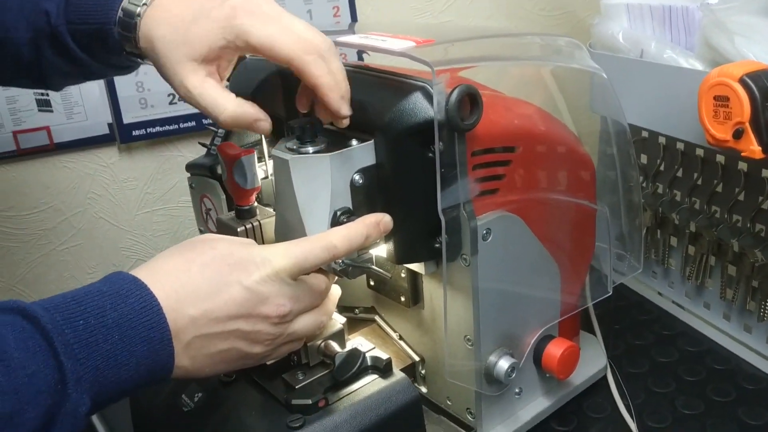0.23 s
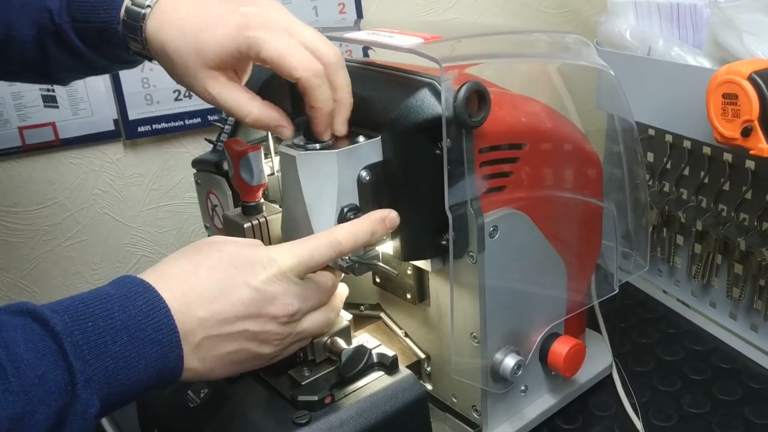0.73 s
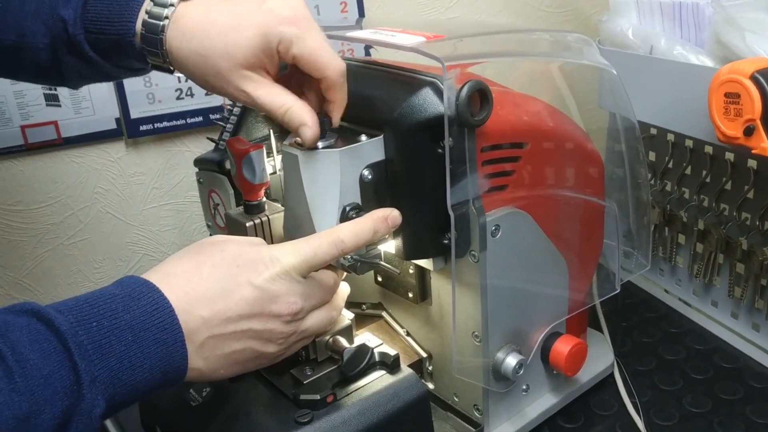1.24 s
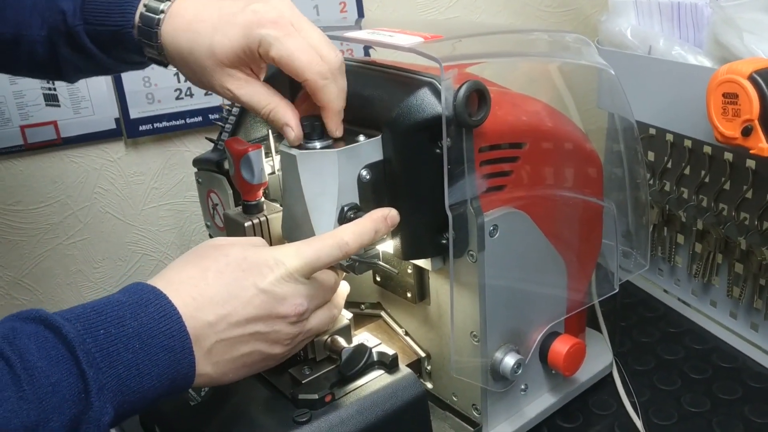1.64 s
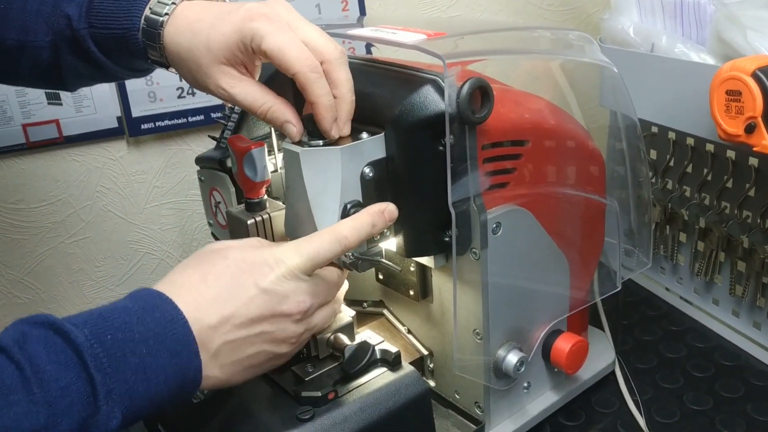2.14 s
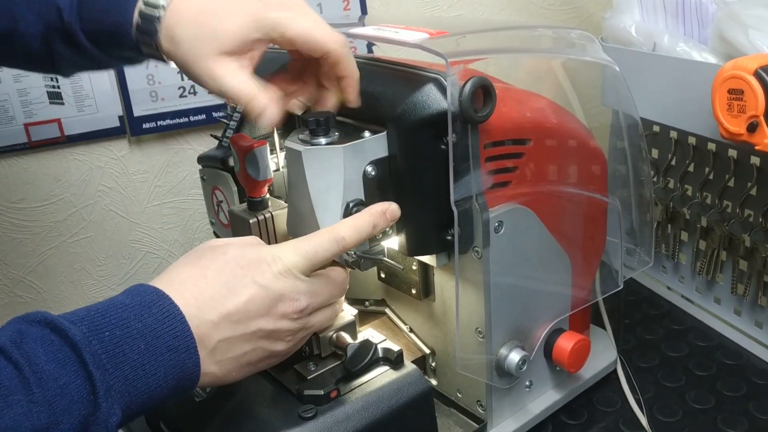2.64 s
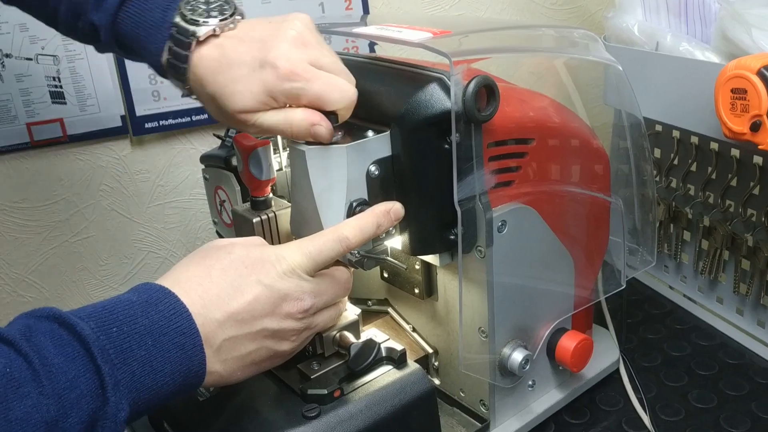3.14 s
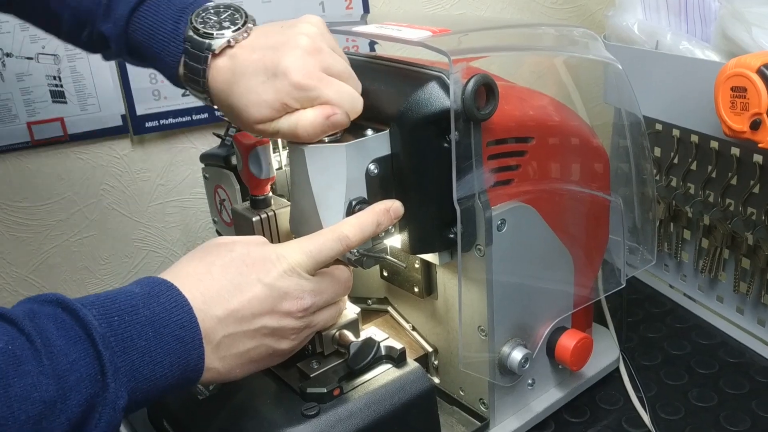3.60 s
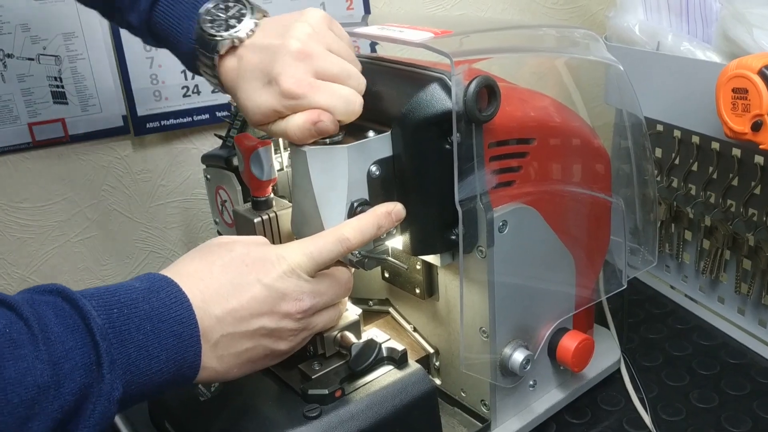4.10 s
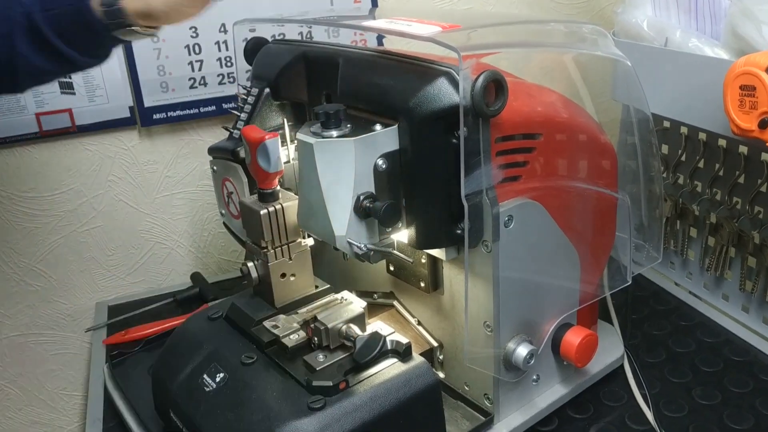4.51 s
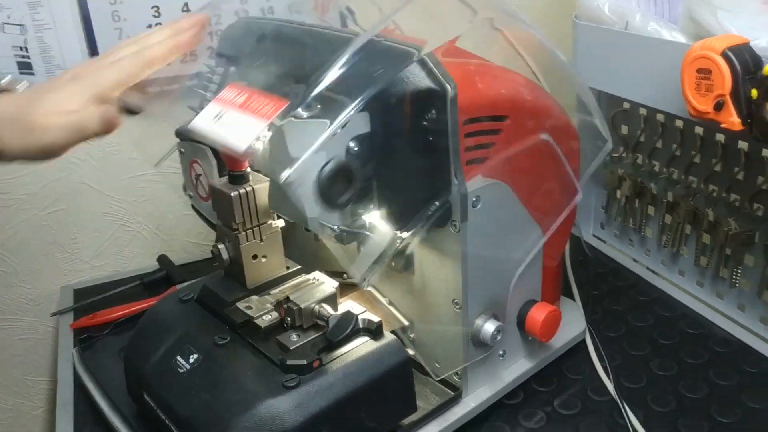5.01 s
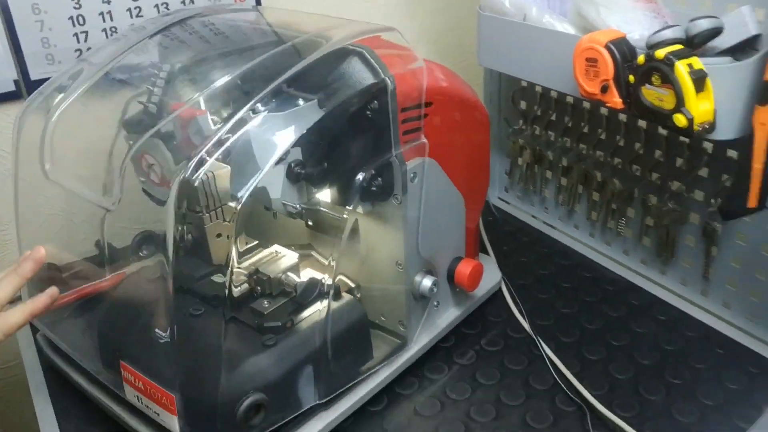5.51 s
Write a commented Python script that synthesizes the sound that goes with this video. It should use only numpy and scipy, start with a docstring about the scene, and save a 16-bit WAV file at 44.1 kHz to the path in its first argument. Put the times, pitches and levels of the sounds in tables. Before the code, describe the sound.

Over steady thin hiss and quiet room murmur, small metal parts tick, scrape and rattle under the fingers. After a sparser stretch comes a bright, heavy metallic clack, the loudest early event. Light scuffs and dull taps on the housing lead to a plastic cover rubbing as it swings, a hollow knock, and a final deep thud with crackling plastic edges. Close, fairly dry stereo pickup.

```python
"""Clamp nut and guard of a key-cutting machine

In a small workshop a clamp nut is turned by hand: its thread scuffs, loose metal clicks, and it seats with a hard clack.
The hand bumps the housing, then the clear plastic guard is swung down and thuds shut.
Metal and plastic are struck modes with filtered noise; slides are trains of tiny slips that drive the metal.
A low room murmur and a thin, ringing hiss, both filtered noise, lie underneath.
"""
import sys
import numpy as np
from scipy import signal
from scipy.fft import rfft, irfft
from scipy.io import wavfile
from scipy.ndimage import uniform_filter1d

SR = 44100
rng = np.random.default_rng(int(sys.argv[2]) if len(sys.argv) > 2 else 0)


def dump(signal):
    """Clip the signal to [-1, 1] and save it as 16-bit WAV at the path in sys.argv[1]."""
    limited = np.clip(np.atleast_2d(signal).T, -1, 1)
    pcm = np.round(limited * 32767).astype(np.int16)
    wavfile.write(sys.argv[1], SR, pcm)


N = 253575
SIZE = int(0.4 * SR)   # length of one contact sound (samples)
AGE = np.arange(SIZE) / SR   # time since the contact began (s)


def from_db(db):
    """Logarithmic level: decibels to amplitude gain."""
    return 10 ** (np.asarray(db) / 20)


def rms_one(x):
    """Mean power: scale to unit rms."""
    return x / np.sqrt(np.mean(x ** 2) + 1e-20)


def loudest_one(x, size=882):
    """Short-time power: scale so that the loudest 20 ms have unit rms."""
    power = uniform_filter1d(np.mean(x ** 2, axis=0), size)
    return x / np.sqrt(power.max() + 1e-20)


def at_hz(points, hz):
    """Logarithmic pitch scale: interpolate a table over log frequency."""
    f, value = np.transpose(points)
    return np.interp(np.log(hz + 1e-3), np.log(f), value)


def pan(db):
    """Interaural level difference: left and right gains that share it equally."""
    return from_db(np.array([db, -db]).reshape(2, -1) / 2)


def band(x, low_hz, high_hz, order=2):
    """Causal filtering: a Butterworth band-pass."""
    edges_hz = [low_hz, min(high_hz, SR / 2 - 1)]
    return signal.sosfilt(signal.butter(order, edges_hz, "band", fs=SR, output="sos"), x)


def around(x, hz, octaves):
    """Constant relative bandwidth: a band-pass given by its centre and width."""
    edge = 2 ** (max(octaves, 0.05) / 2)
    return band(x, hz / edge, hz * edge)


def add(out, s, sound):
    """Superposition: mix a sound in, starting at time s."""
    at = max(round(s * SR), 0)
    out[:, at:at + sound.shape[1]] += sound[:, :N - at]


def drive(response, force):
    """Linear response: convolve the response of a body with the force on it."""
    return signal.fftconvolve(response, force[None], axes=1)[:, :SIZE]


# coherence of the two sides: f/Hz, correlation (1 alike, -1 opposed)
LIKENESS = [(130, 1), (300, 0.85), (640, 0.46), (1400, 0.09), (3100, 0), (6800, -0.17), (15000, 0)]
# level difference of the two sides: f/Hz, left minus right/dB
BALANCE = [(130, 4.5), (330, -1), (550, 3), (1300, 4), (2300, 6), (3800, 0), (7000, 1.5), (11000, 9),
           (15000, 11)]


def noise(spectrum, size):
    """Partial coherence: coloured noise at two microphones, alike in the bass, mostly stronger left in the treble."""
    hz = np.fft.rfftfreq(size, 1 / SR)
    mid, side = rfft(rng.standard_normal((2, size)))
    alike = np.clip(at_hz(LIKENESS, hz), -1, 1)
    pair = np.sqrt(1 + alike) * mid + np.sqrt(1 - alike) * side * [[1], [-1]]
    shaped = pair * from_db(at_hz(spectrum, hz)) * pan(at_hz(BALANCE, hz))
    return rms_one(irfft(shaped, size))


# spectrum of the room murmur: f/Hz, relative level/dB
ROOM_AIR = [(20, -44), (60, -33), (110, -19.5), (150, -9), (190, 9), (240, 0), (400, -5), (650, -8),
            (1200, -11.5), (3000, -10), (4200, -15), (6000, -20), (16000, -16)]
# spectrum of the hiss: f/Hz, relative level/dB
HISS = [(3000, -33), (5200, -7.5), (6200, 0), (6900, 9), (7700, 4.5), (8100, 2), (8600, -4), (9000, -78),
        (10300, -0.5), (11200, -9), (13300, 2), (15600, -3.5), (16000, -24)]
# ringing bands: f/Hz, width/Hz, rms level before the common trim/dB, left minus right/dB
WHINES = [(525, 45, -62.5, 4), (1900, 260, -66, 9), (7130, 200, -57, 4), (7380, 120, -56, 5),
          (8420, 110, -61, 5), (4395, 60, -73, 12), (5850, 240, -70, 4)]


def background(air_db=-51, hiss_db=-51.5, whine_trim_db=-1.0):
    """Stationary noise: a room murmur and a steady hiss with a few narrow bands that ring."""
    out = from_db(air_db) * noise(ROOM_AIR, N) + from_db(hiss_db) * noise(HISS, N)
    for hz, width_hz, db, side_db in WHINES:
        source = rng.standard_normal((2, N)) + 1.3 * rng.standard_normal(N)   # partly common to both sides
        whine = band(source, hz - width_hz / 2, hz + width_hz / 2)
        out += from_db(db + whine_trim_db) * pan(side_db) * rms_one(whine)
    return out


# touching fingers shift the upper modes: full spread as a share of pitch, lower limit (Hz)
TOUCH_DETUNE, DETUNE_ABOVE_HZ = 0.034, 900
# modes of clamp and housing: f/Hz, relative level/dB, t60/s
MACHINE = [(235, -8, .13), (283, -9, .13), (345, -13, .10), (530, 4.5, .11), (675, -7, .08),
           (780, -11, .08), (980, -11, .08), (1190, 2, .1), (1320, -9, .14), (1530, -4, .05),
           (1685, -9, .05), (1922, 7, .055), (2090, -4, .07), (2432, 7, .05), (2500, 5, .055),
           (2580, -1, .10), (2725, -7, .10), (2950, -2, .06), (3150, -3, .05), (3520, -6, .06),
           (3880, -10, .05), (7000, -6, .03), (11600, 1, .04)]


def ring(modes, spread_db, detune):
    """Modal superposition: decaying sines, varied in strength and upper pitch, out of step where the sides differ."""
    out = np.zeros((2, SIZE))
    for k, (hz, db, t60) in enumerate(modes):
        hz = hz * (1 + detune * rng.standard_normal() * (hz > DETUNE_ABOVE_HZ))
        half_phase = np.arccos(np.clip(at_hz(LIKENESS, hz), -1, 1)) / 2
        skew = half_phase * rng.choice([-1, 1]) * np.array([[1], [-1]])
        strength = from_db(db + spread_db * rng.standard_normal())
        gain = (-1) ** k * strength * pan(at_hz(BALANCE, hz))   # neighbours alternate in sign
        out += gain * np.sin(2 * np.pi * hz * AGE + skew) * from_db(-60 * AGE / t60)
    return out


# spectrum of the crowd of short modes: f/Hz, relative level/dB
DENSE = [(100, -66), (200, 5), (700, 9.5), (1500, 9.5), (3000, 6.5), (4000, 2.5), (4800, -3.5), (5900, 3),
         (7500, 3), (9500, -4), (12000, 6.5), (15000, -8.5), (16000, -8)]


def machine(dense_db, dense_t60, spread_db=8.0, detune=TOUCH_DETUNE, hold_s=0.011,
            direct=0.43, direct_s=0.0033, room_db=-21, room_t60=0.31):
    """Impulse response to one touch: main modes, a crowd of short modes and close reflections, a dull room tail."""
    direct_part = direct * np.exp(-AGE / direct_s)
    held_part = from_db(-60 * np.maximum(AGE - hold_s, 0) / dense_t60)
    crowd = (direct_part + held_part) * noise(DENSE, SIZE)
    room = band(noise(DENSE, SIZE), 260, 12000) * from_db(room_db - 60 * AGE / room_t60)
    return ring(MACHINE, spread_db, detune) + from_db(dense_db) * (crowd + room)


KNOCK_DB, TICK_DB = -15, 3.5   # knock relative to the click level; offset added to each snap
CLICK_ROOM_DB = -7   # room tail, relative to the crowd of short modes
PART_DB, PART_OCTAVES = 4.5, 0.18   # narrow band added for the loose part: gain, width
# a weak ring also decays sooner: ring level of the full extra decay (dB), that decay (dB per s)
WEAK_RING_DB, WEAK_DB_PER_S = -74, 498
# ring level at and under which the fingers shift the modes fully (dB); share of that shift in a free ring
TOUCH_RING_DB, FREE_DETUNE_SHARE = -13.5, 0.25
# edges of the six bands thud, knock, main, ring, edge, snap: f/Hz
CLICK_BANDS_HZ = [170, 400, 900, 2200, 2800, 4200, 16500]
# metal contacts: t/s, level/dB, then relative to it ring/dB, edge/dB, snap before TICK_DB/dB, thud/dB; loose part f/Hz
CLICKS = [(0.106, -34, -13, -28, -26, -40, 1660), (0.219, -39.5, -6, -21, -22, -19, 1700),
          (0.45, -37.5, 2.5, -4.5, -13, -10.5, 2410), (0.472, -34, -6, -7, -10.5, -29, 2140),
          (0.528, -43.5, 1, -1.5, -17, -5, 2060), (0.632, -42, -20, -15, -17, -5.5, 1560),
          (0.728, -40, -10, -6.5, -17, -7.5, 1770), (0.777, -47, -1, -14, -16, -8, 1860),
          (0.828, -39, -5.5, -9.5, -24, -26, 1990), (1.041, -31.5, 3, -3, -9, -29, 2410),
          (1.078, -32, 3.5, -2, -5.5, -21, 2340), (1.314, -37.5, 5.5, -7, -5, -8, 3010),
          (1.354, -30, -8, -11, -12, -19, 2070), (2.0845, -37.5, -31, -8, -6.5, -41, 5800),
          (2.1822, -33, -36, -11.5, -3.5, -18, 6060), (2.555, -35.5, -13, -14.5, -9, -8, 1640),
          (3.414, -44.5, 2, 1, -10, -16, 2500), (3.49, -53.5, -15, -4, 5.5, -9, 6450),
          (4.307, -48, -6, -20, -18, 0.5, 1770), (4.341, -43, -3.5, -7, -4.5, -2, 1500)]


def clicks(tick_t60=0.078, thump_db=-35, build_cycles=3):
    """Impact and damping: metal on metal, each click with its own ring, snap and thud; a weak ring decays sooner."""
    out = np.zeros((2, N))
    for s, db, ring_db, edge_db, snap_db, thud_db, part_hz in CLICKS:
        detune = TOUCH_DETUNE * np.clip(ring_db / TOUCH_RING_DB, FREE_DETUNE_SHARE, 1)
        blow = machine(dense_db=4.5, dense_t60=0.048, spread_db=0.5, detune=detune,
                       direct=2.3, room_db=CLICK_ROOM_DB)
        blow = blow + from_db(PART_DB) * around(blow, part_hz, PART_OCTAVES)
        # the vibration takes a few cycles to spread through the housing, so the lows swell last
        parts = []
        for low, high in zip(CLICK_BANDS_HZ, CLICK_BANDS_HZ[1:]):
            swell = -np.expm1(-AGE * high / build_cycles)
            parts.append(band(blow, low, high, order=4) * swell)
        parts[-1] = parts[-1] * from_db(-60 * AGE / tick_t60)   # the bright tick gets extra decay
        weakness = np.clip(ring_db / WEAK_RING_DB, 0, 1)
        damping = from_db(-WEAK_DB_PER_S * weakness * AGE)
        gains = from_db(db + np.array([thud_db, KNOCK_DB, 0, ring_db, edge_db, snap_db + TICK_DB]))
        struck = sum(gain * loudest_one(part * damping) for part, gain in zip(parts, gains))
        # a very faint sub-bass thump under the blow
        thump = from_db(db + thump_db) * loudest_one(band(blow, 32, 84))
        add(out, s, thump + struck)
    return out


HAND_RUMBLE_DB = -11.5   # the sliding hand rumbles in the housing: level relative to the slide
SCUFF_BANDS_HZ = np.geomspace(150, 9600, 13)
# slides of thread and fingers: t at the middle/s, half-length/s, level before level_db/dB,
# brightness f/Hz, its fall/octaves
SCUFFS = [(0.117, 0.013, -35.5, 1220, 1.1), (0.437, 0.0055, -40.5, 2050, 0.21),
          (0.523, 0.011, -40, 2310, 1.4), (0.604, 0.013, -38.5, 1900, .5), (0.71, 0.0083, -44, 1900, 0.26),
          (0.812, 0.015, -46.5, 2100, 1), (0.948, 0.021, -38.5, 1060, 0.47),
          (1.195, 0.0098, -43.5, 1560, 1.2), (1.229, 0.02, -34.5, 1010, 1.9),
          (1.313, .003, -41, 2200, 0.052), (1.39, 0.013, -40, 1680, 0.97), (1.499, 0.019, -49.5, 1500, .3),
          (1.84, 0.017, -41.5, 1030, 2.5), (2.12, 0.0083, -34, 756, 1.3), (2.143, 0.013, -45.5, 580, 0.86),
          (2.396, 0.014, -44, 380, .6), (2.582, 0.014, -40.5, 426, -0.055),
          (2.637, 0.0075, -48.5, 710, 1.9), (2.757, 0.048, -63, 304, -1.2), (2.805, 0.013, -48, 1700, 1),
          (2.894, 0.0099, -38.5, 790, 1.1), (2.915, 0.0086, -38.5, 890, 2.7),
          (3.43, 0.0086, -42.5, 2200, 0.84), (3.454, 0.014, -42.5, 2120, -0.53),
          (3.813, 0.0041, -47, 1300, 1.7), (4.168, 0.02, -47, 580, 0.45), (4.216, 0.015, -43, 2220, 0.46),
          (4.26, 0.04, -47.5, 1610, 1.4), (4.359, .014, -46, 690, 1.1), (5.549, 0.006, -42.5, 1570, 0.31),
          (5.674, 0.0083, -38.5, 2700, -0.85), (5.691, 0.011, -39.5, 2000, .5)]


def scuffs(slips_per_s=600, grain_db=12.5, lead_s=0.0048, width_octaves=0.98,
           grit_db=-17, level_db=-2, sharpness=1.17):
    """Stick-slip friction: slips swell and fade with pressure as the brightness glides; skin adds a dry rasp."""
    out = np.zeros((2, N))
    for s, half_s, db, bright_hz, fall_octaves in SCUFFS + skids():
        middle_s = 3 * half_s
        pressure = 1 / np.cosh(np.minimum(sharpness * np.abs(AGE - middle_s) / half_s, 20))
        slips = (rng.random(SIZE) < slips_per_s / SR) * rng.choice([-1, 1], SIZE)
        force = pressure * slips * from_db(grain_db * rng.uniform(-0.77, 1, SIZE))
        touch = machine(dense_db=22, dense_t60=0.022, hold_s=0.009, direct=1.03,
                        direct_s=0.00045, room_db=-16.5)
        rub = drive(touch, force)
        centre_hz = bright_hz * 2 ** (-fall_octaves / 2 * np.tanh((AGE - middle_s) / half_s))
        body = 0
        for low, high in zip(SCUFF_BANDS_HZ, SCUFF_BANDS_HZ[1:]):
            octaves_off = np.log2(np.sqrt(low * high) / centre_hz)
            body = body + band(rub, low, high) / np.hypot(1, (octaves_off / width_octaves) ** 2)
        skin = noise([(800, -22), (3000, 9.0), (4200, 22), (7000, 9.0)], SIZE)
        rasp = from_db(grit_db) * loudest_one(skin * pressure)
        rumble = from_db(HAND_RUMBLE_DB) * loudest_one(band(rub, 202, 420))
        add(out, s - middle_s - lead_s, from_db(db + level_db) * (loudest_one(body) + rasp + rumble))
    return out


# delay after the click (s), half-length (s), level relative to the click and its upper limit (dB, before level_db)
SKID_DELAY_S, SKID_HALF_S, SKID_DB, SKID_MAX_DB = 0.023, 0.01, -7, -46.5
SKID_HZ, SKID_FALL_OCTAVES = 1510, 1   # brightness and its fall


def skids():
    """Residual motion: the parts skid on briefly, one short slide after each click."""
    return [(s + SKID_DELAY_S, SKID_HALF_S, min(db + SKID_DB, SKID_MAX_DB), SKID_HZ, SKID_FALL_OCTAVES)
            for s, db, *_ in CLICKS]


PUSH_S = 0.0062   # time constant of the soft push
# soft low thuds, the first two under metal clicks, the rest the hand on the housing: t/s, level/dB
BUMPS = [(1.082, -45), (1.317, -35.5), (3.695, -46), (3.83, -44), (3.913, -38.5), (4.006, -44),
         (4.152, -40), (4.354, -41.5), (4.675, -41), (4.791, -49.5), (4.868, -44), (4.925, -46)]


def bumps():
    """Soft contact: a slow push, as from flesh, heard only in the lowest modes of the housing."""
    out = np.zeros((2, N))
    for s, db in BUMPS:
        force = rng.standard_normal(SIZE) * np.exp(-(AGE / PUSH_S) ** 2)
        thud = drive(machine(dense_db=-5.5, dense_t60=0.0088), force)
        add(out, s - 0.003, from_db(db) * loudest_one(band(thud, 156, 302, order=3)))
    return out


SEAT_S, SEAT_DB = 3.2587, -15   # the nut strikes home: time, level of the blow
CLAMP_DB = 0   # upper modes of the clamp, relative to the blow
# the housing under the nut: upper edge of its modes, level relative to the blow, delay, swell time constant
HOUSING_HZ, HOUSING_DB, HOUSING_DELAY_S, HOUSING_SWELL_S = 1330, -10, 0.001976, 0.011
# the faces crack together twice: t/s, crack level/dB, treble snap level/dB
SEATING = [(3.2577, -29.5, -30.5), (3.2638, -25.5, -37)]


def seating(top_hz=3300, snap_t60=0.052, thump_db=-41, crush_s=0.0006, nut_db=2, nut_hz=2450, grind_t60=0.03):
    """Rigid impact: a rough metal crack, the clamp ringing at its own pitches, then the housing swelling below."""
    out = np.zeros((2, N))
    for s, db, snap_db in SEATING:
        grind = band(noise(DENSE, SIZE) * from_db(-60 * AGE / grind_t60), 1520, top_hz, order=4)
        snap = band(noise(DENSE, SIZE) * from_db(-60 * AGE / snap_t60), 2600, 10600)
        add(out, s, from_db(db) * loudest_one(grind) + from_db(snap_db) * loudest_one(snap))
    blow = machine(dense_db=-3, dense_t60=0.05, spread_db=0.6, detune=0, direct=1, room_db=-7, room_t60=0.3)
    nut = from_db(nut_db - 9) * around(blow, nut_hz, 1.0)
    clamp = (blow + nut) * -np.expm1(-AGE / crush_s)
    clamp = loudest_one(band(clamp, HOUSING_HZ, top_hz, order=4))
    add(out, SEAT_S, from_db(SEAT_DB + CLAMP_DB) * clamp)
    # a very faint sub-bass thump under the blow
    thump = from_db(thump_db) * loudest_one(band(blow, 26, 72))
    body = band(blow * -np.expm1(-AGE / HOUSING_SWELL_S), 250, HOUSING_HZ, order=2)
    housing = from_db(HOUSING_DB) * loudest_one(body)
    add(out, SEAT_S + HOUSING_DELAY_S, from_db(SEAT_DB) * (housing + thump))
    return out


def chatter(contacts_per_s=450, spread_db=5, touch_s=0.0018):
    """Repeated contact: the envelope of a loose edge that touches again and again after the first blow."""
    touches = (rng.random(SIZE) < contacts_per_s / SR) * from_db(spread_db * rng.uniform(-1.2, 1, SIZE))
    touches[0] = from_db(spread_db)
    return signal.lfilter([1], [1, -np.exp(-1 / (touch_s * SR))], touches + 1e-18)


# a harder hit is a shorter contact: length at a boom entry of 0 dB (s), drop in that entry that doubles it (dB)
CONTACT_S, CONTACT_DOUBLES_DB = 0.00175, 31
# offsets added to the tabled levels; fade-in that ends at the first point of the swing
RUB_DB, SWISH_DB, BOOM_DB, SWING_FADE_S = 3, 9, -9.5, 0.038
# the guard on its way down: t/s, rubbing level before RUB_DB/dB, treble swish level before SWISH_DB/dB
SWING = [(5.1, -88, -75), (5.216, -58, -61), (5.376, -44.5, -60), (5.416, -49.5, -53.5), (5.494, -49, -67),
         (5.553, -48.5, -53.5), (5.656, -53, -59.5), (5.7, -52.5, -51.5), (5.719, -32, -71)]
# modes of the plastic guard: f/Hz, relative level/dB, t60/s
GUARD = [(172, -20, 0.091), (221.8, -10, 0.11), (274, -10.5, 0.057), (315, -19.5, 0.13), (568, -4.5, 0.026),
         (651, -16.5, 0.094)]
# the guard meets its stops: t/s, boom level before BOOM_DB/dB, crack level/dB, crack f/Hz, crack width/octaves
GUARD_HITS = [(5.342, -20.5, -47, 1200, 0.78), (5.364, -11, -35.5, 1410, 2),
              (5.418, -34, -35.5, 2160, 0.45), (5.703, -21, -47, 700, 1.7), (5.711, -20, -31, 1320, 0.52),
              (5.7251, 0.5, -39, 2200, 0.45), (5.736, -2, -32.5, 2050, 0.42),
              (5.741, -21, -30.5, 1210, 0.74)]


def guard(room_db=-22, room_t60=0.32, crack_t60=0.051, crack_delay_s=0.00109, thump_db=-55):
    """Friction, then shell resonance: the plastic rubs on its hinge as it swings; at a stop it booms and cracks."""
    s, rub_db, swish_db = np.transpose(SWING)
    now = np.arange(N) / SR
    rub_spectrum = [(100, -26), (220, 14.0), (500, 5), (1200, 2.5), (2600, 1.0), (4200, -17), (9000, -17.0)]
    swish_spectrum = [(2000, -10), (4500, -2), (7000, -11), (9500, -6), (13000, -3.5), (16000, -10.0)]
    room_spectrum = [(40, -22), (100, -59), (220, 12), (400, 0), (550, 7), (1200, -35), (4000, -55)]
    out = from_db(RUB_DB + np.interp(now, s, rub_db)) * noise(rub_spectrum, N)
    out += from_db(SWISH_DB + np.interp(now, s, swish_db)) * noise(swish_spectrum, N)
    out *= np.clip((now - s[0]) / SWING_FADE_S + 1, 0, 1)
    shell = sum(from_db(db - 60 * AGE / t60) * np.cos(2 * np.pi * hz * AGE) for hz, db, t60 in GUARD)
    for s, db, crack_db, crack_hz, crack_octaves in GUARD_HITS:
        contact_s = CONTACT_S * 2 ** (-db / CONTACT_DOUBLES_DB)
        push = np.sin(np.pi * np.minimum(AGE / contact_s, 1))   # half a sine
        room = noise(room_spectrum, SIZE) * from_db(room_db - 60 * AGE / room_t60)
        shaken = drive(shell + room, push)
        boom = band(shaken, 196, 1050, order=6)
        add(out, s - 0.0015, from_db(db + BOOM_DB) * loudest_one(boom))
        # a very faint sub-bass thump under the blow
        add(out, s, from_db(thump_db + db / 2) * loudest_one(band(shaken, 15, 45, order=3)))
        snap = noise(DENSE, SIZE) * chatter() * from_db(-60 * AGE / crack_t60)
        crack = around(snap, crack_hz, crack_octaves) + from_db(-20.5) * snap
        add(out, s + crack_delay_s, from_db(crack_db) * loudest_one(crack))
    return out


def scene():
    """Superposition: all the handling sounds over the background."""
    return background() + clicks() + scuffs() + bumps() + seating() + guard()


CUTOFF_HZ = 15900


def record(dry):
    """Band limitation: the microphone drops the deepest bass; the top is cut."""
    thin = signal.sosfilt(signal.butter(1, 60, "high", fs=SR, output="sos"), dry)
    return signal.sosfilt(signal.ellip(10, 0.1, 80, CUTOFF_HZ, fs=SR, output="sos"), thin)


dry = scene()
out = record(dry)
dump(out)
```